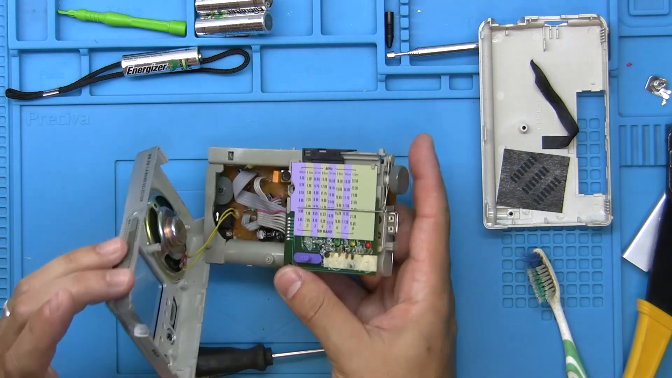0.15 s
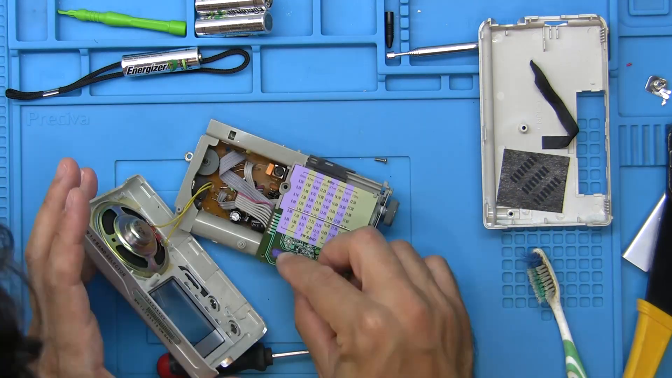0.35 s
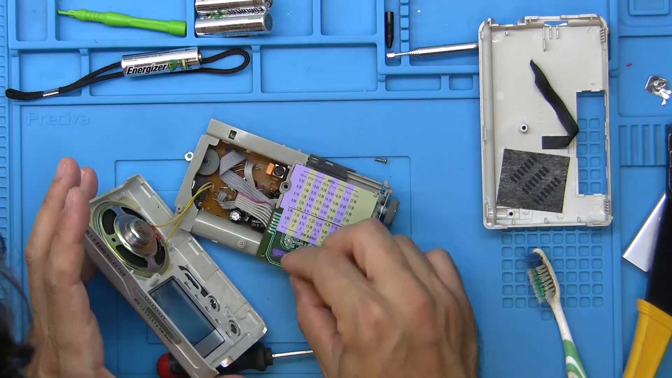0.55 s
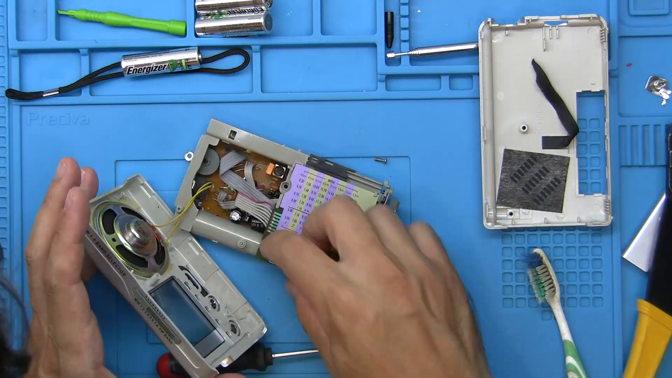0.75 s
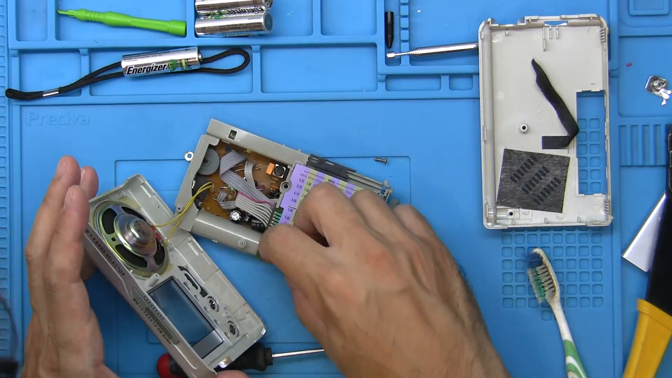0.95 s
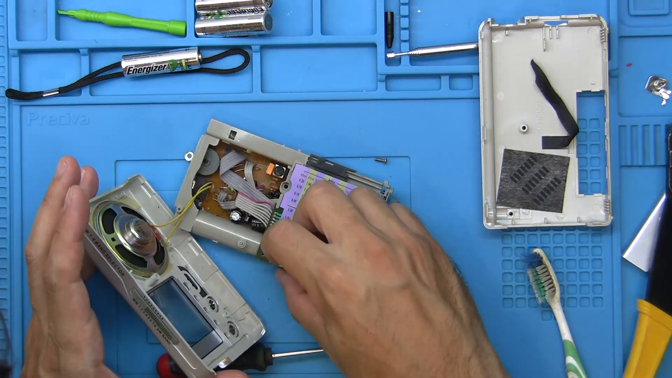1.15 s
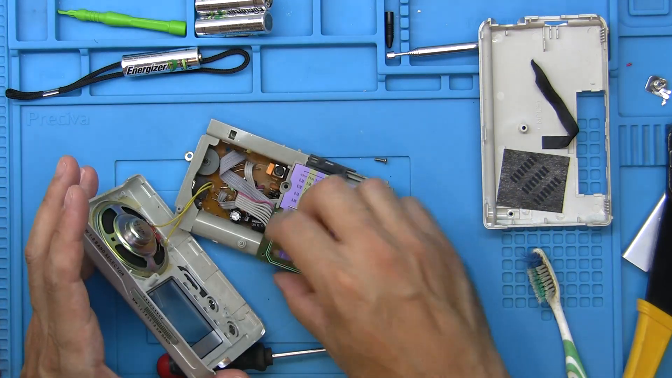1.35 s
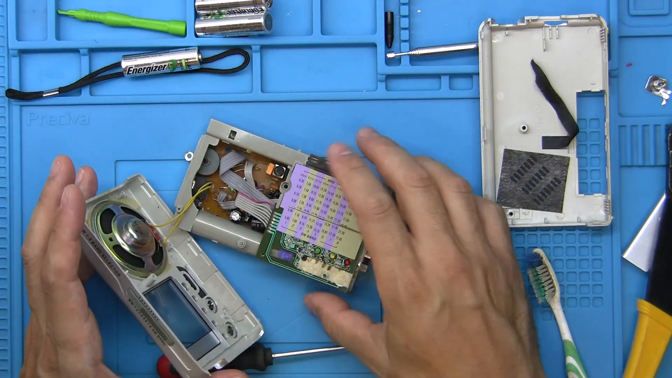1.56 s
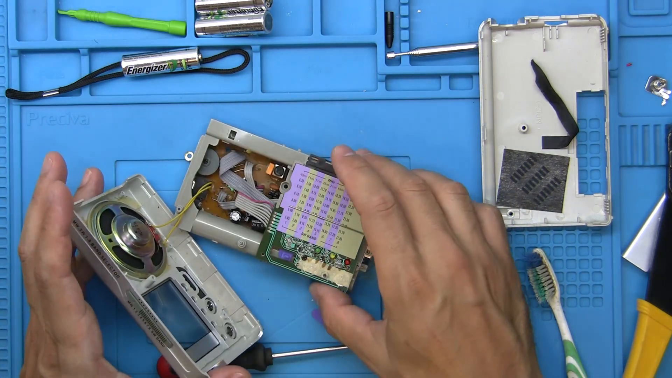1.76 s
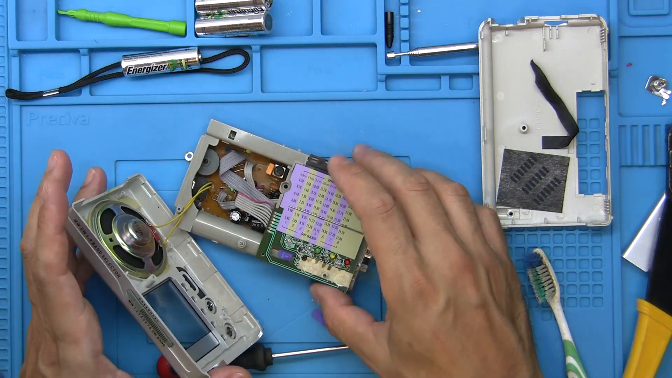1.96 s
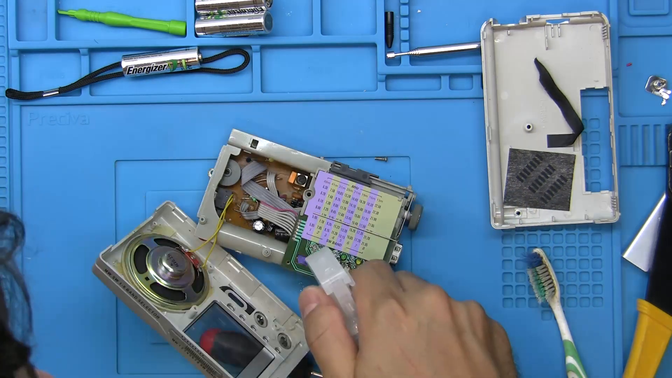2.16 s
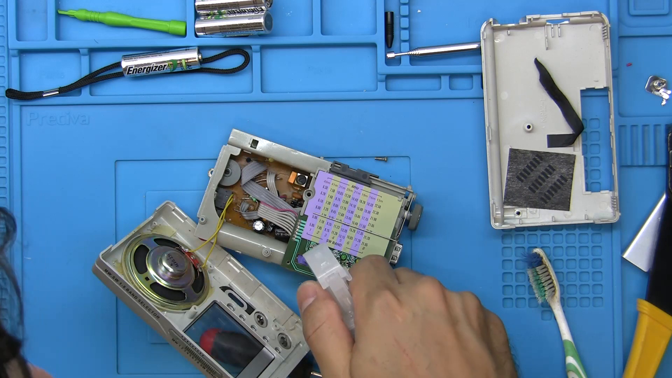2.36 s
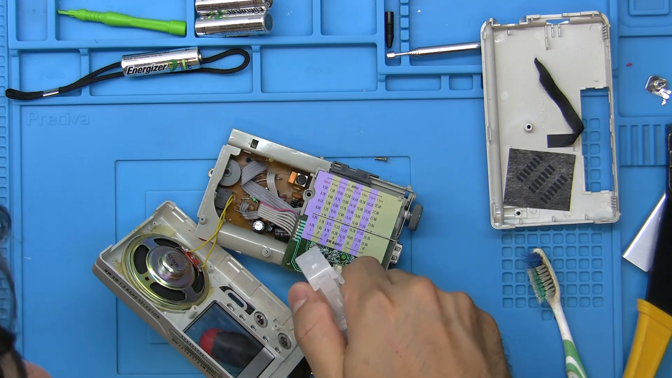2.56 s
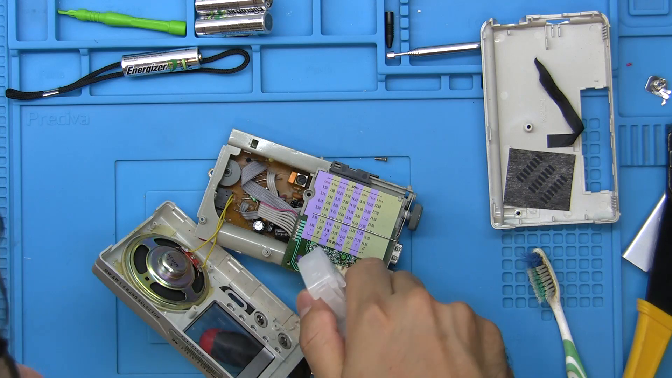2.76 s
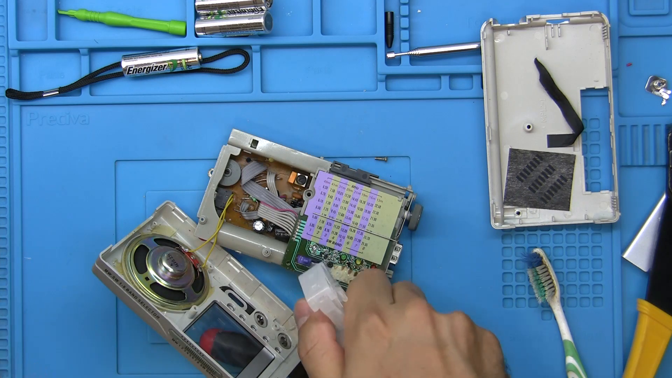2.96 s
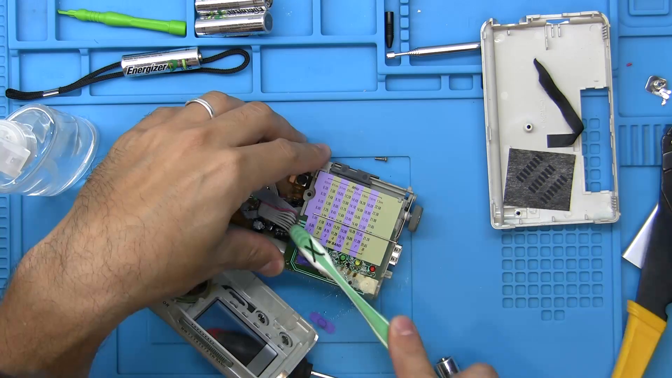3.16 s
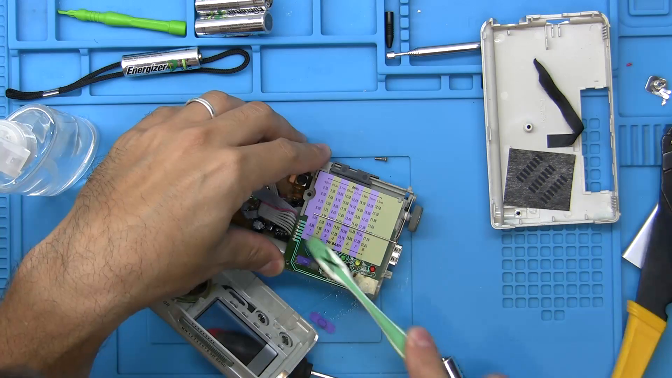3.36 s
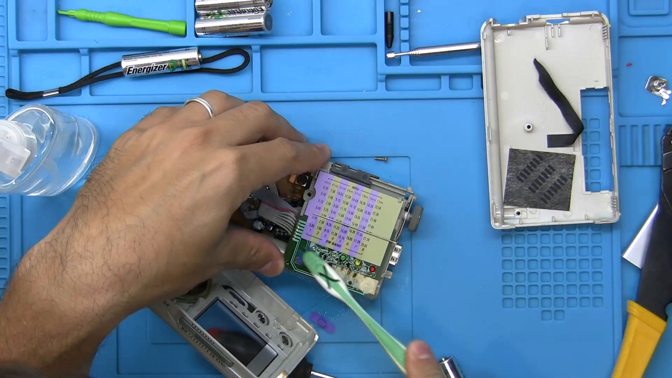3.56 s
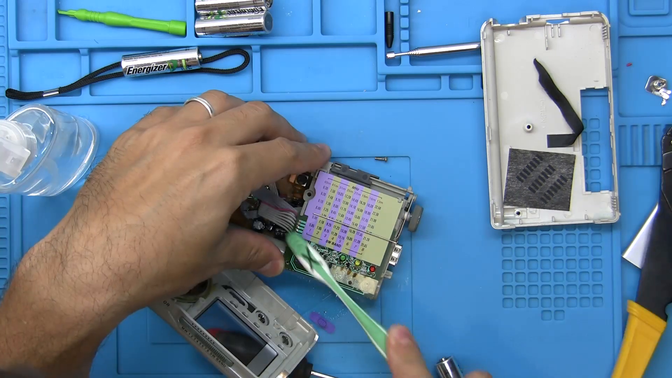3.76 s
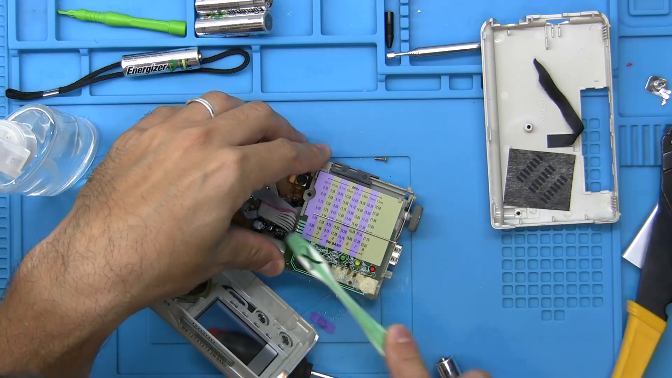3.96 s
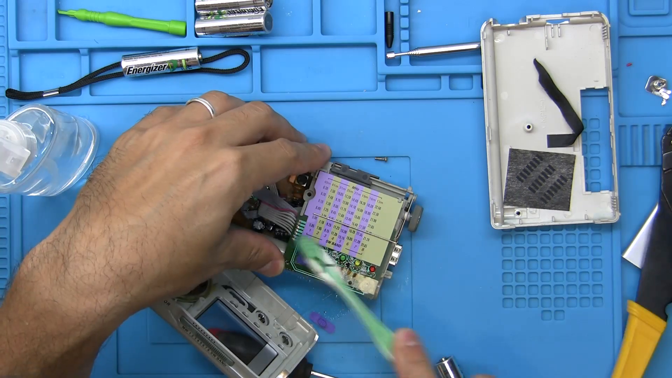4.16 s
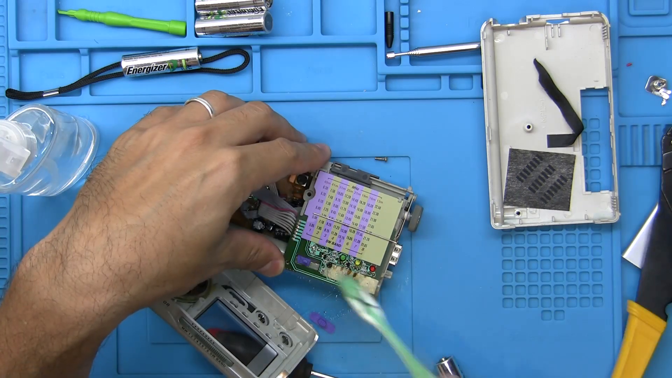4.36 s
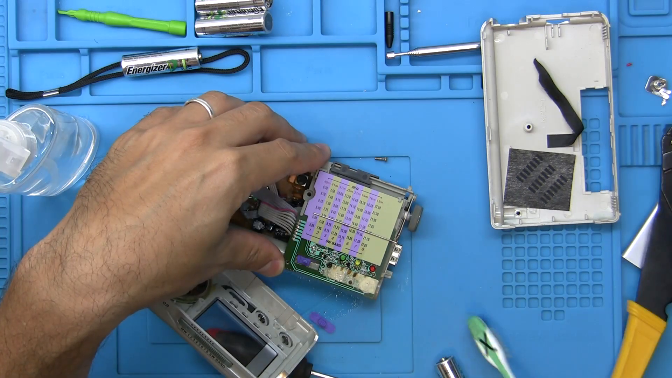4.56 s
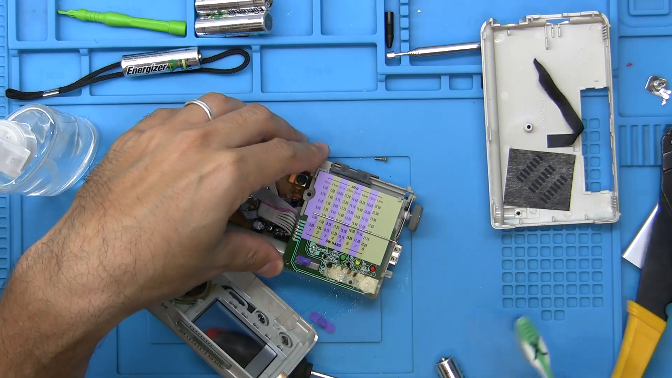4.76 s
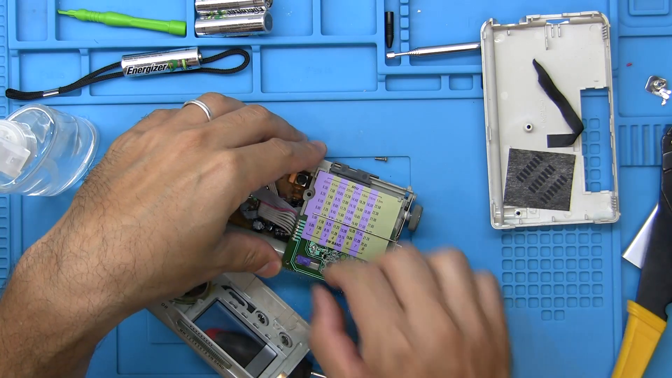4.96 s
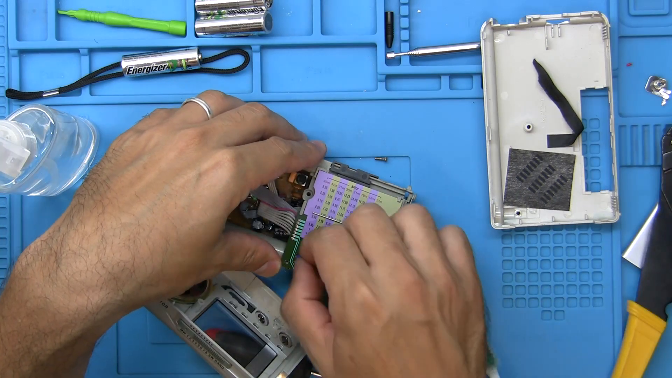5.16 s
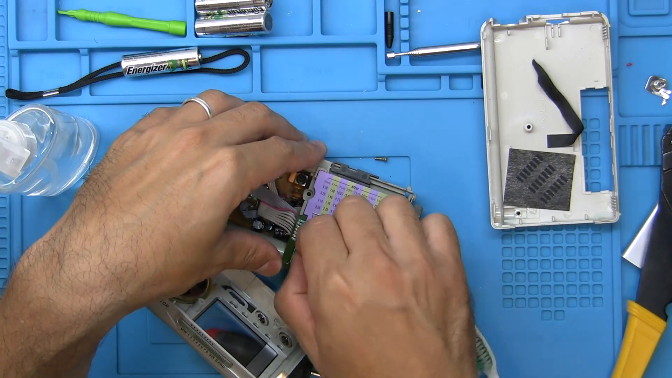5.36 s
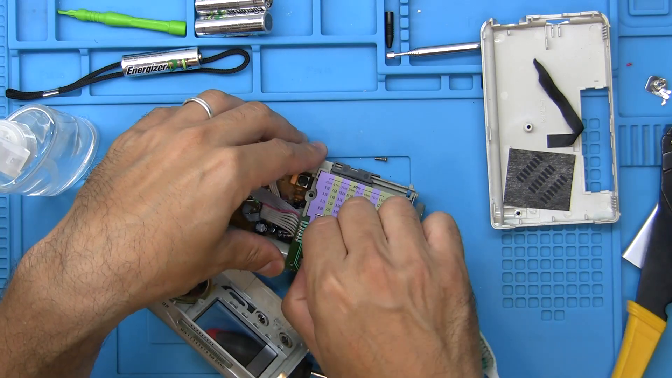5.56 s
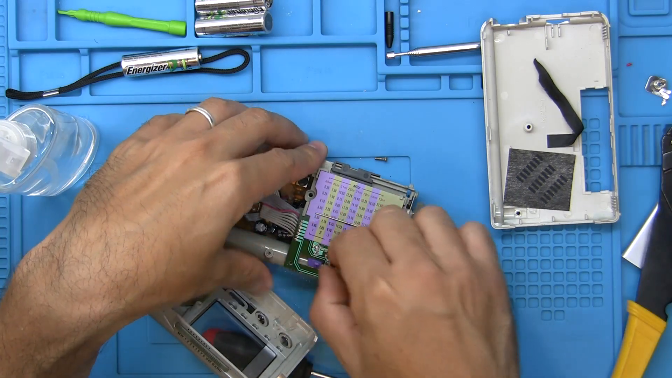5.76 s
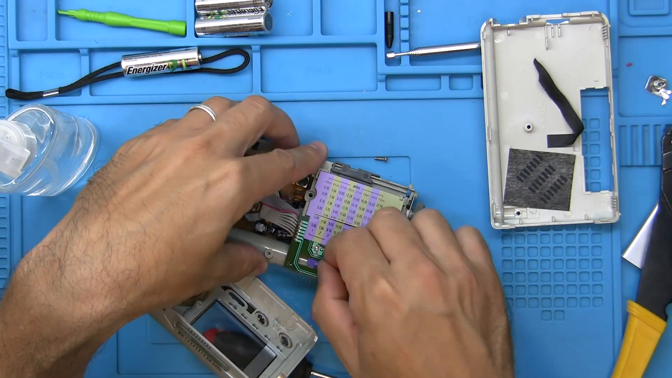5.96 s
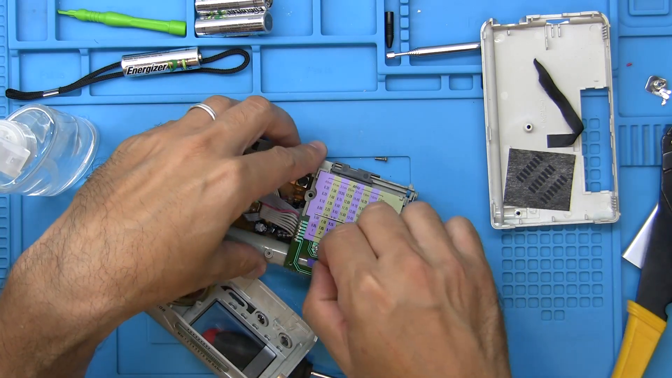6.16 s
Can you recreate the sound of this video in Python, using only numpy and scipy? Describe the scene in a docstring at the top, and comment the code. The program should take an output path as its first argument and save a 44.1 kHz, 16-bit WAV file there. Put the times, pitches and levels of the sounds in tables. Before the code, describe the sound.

Soft thuds and rubbing of a plastic case on a mat, then scattered bright switch clicks, one of them strong. After a quiet gap come two short liquid hisses and about ten scratchy toothbrush strokes with light ticks among them. A dropped hard thing knocks boomily, rebounds more softly, and final clicks follow. Closely miked indoors, with short room echo over steady airy noise and low rumble.

```python
"""A small switch clicks on a circuit board: impulses ring plastic modes and rattle.
It is squirted with cleaner and scrubbed with a toothbrush: coloured grain noise, as is handling on a mat.
Something hard drops and bounces to rest further off: filtered impacts ring its modes and a floor boom.
Throughout, ventilation noise with a fan hum and a low rumble; the level dips briefly three times."""
import sys
import numpy as np
from scipy import signal
from scipy.fft import rfft, irfft
from scipy.io import wavfile
from scipy.ndimage import uniform_filter1d

SR = 44100
rng = np.random.default_rng(int(sys.argv[2]) if len(sys.argv) > 2 else 0)


def transcribe(u):
    """Save the signal u as a 16-bit wav file named by the first command-line argument.

    u: samples, shape (n,) or (channels, n), limited to [-1, 1]; the rate is SR.
    q: integer samples, one column per channel.
    """
    v = np.clip(np.atleast_2d(u).T, -1, 1)
    q = np.round(v * 32767).astype(np.int16)
    wavfile.write(sys.argv[1], SR, q)


N = 273728


def gain_of(db):
    """Amplitude gain of a level in dB."""
    return 10 ** (np.asarray(db) / 20)


def evened(x):
    """Scale to rms 1."""
    return x / np.sqrt(np.mean(x ** 2) + 1e-20)


def read(points, hz):
    """Interpolate a (frequency, value) table over log frequency."""
    f, value = np.transpose(points)
    return np.interp(np.log(hz + 1), np.log(f + 1), value)


def add(mix, start_s, sound):
    """Add a sound into the mix, cut at the end."""
    part = mix[..., round(start_s * SR):][..., :sound.shape[-1]]
    part += sound[..., :part.shape[-1]]


def coloured(x, points):
    """Causal minimum-phase filter with the given spectrum."""
    hz = abs(np.fft.fftfreq(4096, 1 / SR))
    log_gain = np.log(gain_of(np.maximum(read(points, hz), -100)))
    taps = np.fft.ifft(np.exp(np.conj(signal.hilbert(log_gain)))).real[:2048]
    return signal.oaconvolve(x, taps)[:len(x)]


def ring(x, hz, width_hz):
    """One mode of gain 1 at its centre, driven by x."""
    return signal.lfilter(*signal.iirpeak(hz, hz / width_hz, SR), x)


def wander(rate_hz):
    """Slow random drift of rms 1: sines up to rate_hz, slower ones stronger."""
    t = np.arange(N) / SR
    rates_hz = rate_hz * np.geomspace(.05, 1, 12)
    return evened(sum(np.sin(2 * np.pi * (f * t + rng.random())) / np.sqrt(f) for f in rates_hz))


def grains(per_s, spread_db):
    """A dense random train of ticks of uneven size."""
    size = gain_of(spread_db * np.minimum(rng.exponential(1, N), 4)) * rng.standard_normal(N)
    return size * (rng.random(N) < per_s / SR)


def patchy(x, patch_db):
    """Random patches of louder and softer colour over time and pitch."""
    z = signal.stft(x, nperseg=256)[2]
    patches = rng.standard_normal(z.shape[::-1]).T
    patches = uniform_filter1d(uniform_filter1d(patches, 5, axis=0), 9, axis=1)
    return signal.istft(z * gain_of(patch_db * evened(patches)), nperseg=256)[1][:N]


def peaked(peak_s, db, swell_db_per_s, fade_db_per_s):
    """A level that swells to its peak at peak_s and fades, both linear in dB."""
    t = np.arange(N) / SR - peak_s
    return gain_of(db + np.minimum(swell_db_per_s * t, -fade_db_per_s * t))


def panned(x, left_over_right_db):
    """Mono to stereo by level difference."""
    return x * gain_of([[left_over_right_db / 2], [-left_over_right_db / 2]])


# room tone spectrum: (frequency [Hz], relative level [dB])
AIR_SPECTRUM = [(20, -22), (38, -23), (70, -31), (130, -11), (200, -9.5), (330, -11.5), (550, -14.5),
                (900, -20), (1400, -23.5), (2100, -26), (2600, -31.5), (5000, -39), (13500, -52),
                (14800, -72)]
# left-right correlation of the room tone: (frequency [Hz], correlation [-1..1])
AIR_CORRELATION = [(60, -0.63), (240, -0.038), (950, -0.22), (3770, -0.53), (15000, -0.15)]
# fan hum lines: (frequency [Hz], mean level [dB rms], rms waver [share of frequency])
HUM_LINES = [(99.4, -53, 0.0026), (196.3, -53, 0.0071)]
AIR_DB, AIR_START_DB, AIR_SETTLE_S = -48, 3.5, 0.24  # starts louder by AIR_START_DB and settles


def room_tone():
    """Ventilation noise in drifting patches, with wavering hum lines."""
    frames, hz = N // 256 + 5, np.fft.rfftfreq(1024, 1 / SR)
    a, b, c, d, patches = rng.standard_normal((frames, 513, 5)).T
    patches = evened(uniform_filter1d(uniform_filter1d(patches, 10, axis=0), 12, axis=1))
    same = np.clip(read(AIR_CORRELATION, hz), -1, 1)[:, None]
    left = a + 1j * b
    right = same * left + np.sqrt(1 - same ** 2) * (c + 1j * d)
    level_db = read(AIR_SPECTRUM, hz)[:, None] + 1.67 * np.clip(patches, -2, 2)
    z = np.array([left, right]) * gain_of(level_db)
    air = evened(signal.istft(z, nperseg=1024, noverlap=768)[1][:, :N])
    out = air * gain_of(AIR_DB + AIR_START_DB * np.exp(-np.arange(N) / SR / AIR_SETTLE_S))
    for f, db, waver in HUM_LINES:
        turns = np.cumsum(f * (1 + waver * wander(6))) / SR
        out += np.sqrt(2) * gain_of(db + 1.1 * wander(12)) * np.sin(2 * np.pi * turns)
    return out


# rumble level before its random swell: (time [s], level [dB])
RUMBLE_LEVEL = [(0.0, -54.5), (0.3, -59), (1.16, -55.5), (1.9, -54), (2.55, -62.5), (4.7, -62.5),
                (5.08, -58), (6.2, -56)]
# rumble spectrum: (frequency [Hz], relative level [dB])
RUMBLE_SPECTRUM = [(15, -29), (35, 0), (60, 9), (75, -16), (160, 3.5), (300, -46)]
RUMBLE_SWELL_DB = 4.5  # rms


def rumble():
    """Low noise that swells slowly, nearly alike in both channels."""
    spectrum = gain_of(read(RUMBLE_SPECTRUM, np.fft.rfftfreq(N, 1 / SR)))
    mid, side = irfft(rfft(rng.standard_normal((N, 2)).T) * spectrum, N)
    level_db = np.interp(np.arange(N) / SR, *np.transpose(RUMBLE_LEVEL)) + RUMBLE_SWELL_DB * wander(3.16)
    return gain_of(level_db) * evened(np.array([mid + 0.14 * side, mid - 0.66 * side]))


# fingers and case shifting on the mat:
# (peak time [s], envelope peak [dB], swell [dB/s], fade [dB/s])
HAND_SLIPS = [(0.001, -51, 200, 150), (0.104, -45, 600, 170), (0.36, -51, 150, 400), (0.692, -60, 240, 897),
              (0.77, -61, 300, 100), (1.705, -55.5, 900, 130), (2.092, -55, 900, 2000),
              (5.515, -46.5, 900, 132), (5.623, -48, 600, 1400), (5.79, -56.5, 800, 59),
              (6.168, -64, 32, 400)]
# slip spectrum: (frequency [Hz], relative level [dB])
RUSTLE_SPECTRUM = [(180, -40), (300, -11), (405, -17), (455, 11), (555, -7.5), (787, 2.5), (5080, -15.5),
                   (9090, -30), (13800, -29), (16000, -54)]
# case bumping the soft mat: (peak time [s], envelope peak [dB])
MAT_THUDS = [(0.005, -43), (0.112, -43), (0.37, -48.5), (0.478, -46)]
THUD_SWELL_DB_PER_S, THUD_FADE_DB_PER_S = 350, 302


def hands():
    """Skin and plastic drag on silicone in sparse slips; the case thuds dully on the mat."""
    bumps = sum(peaked(s, db, THUD_SWELL_DB_PER_S, THUD_FADE_DB_PER_S) for s, db in MAT_THUDS)
    thuds = bumps * evened(ring(ring(rng.standard_normal(N), 122, 48), 140, 48))
    slips = sum(peaked(*row) for row in HAND_SLIPS)
    return slips * evened(coloured(grains(4000, 1.7), RUSTLE_SPECTRUM)) + thuds


# slide switch and plastic case snapping: (time [s], nominal peak [dB], main ring [Hz],
# treble mode offset [dB], knock [Hz], knock relative to main ring [dB])
SWITCH_CLICKS = [(0.0702, -43, 2250, -25, 452, -2), (0.1005, -31.5, 3400, -39, 570, 37),
                 (0.4409, -34, 3190, -18, 900, -1), (0.6873, -52, 2380, -1, 576, -5),
                 (0.7894, -51, 2260, -4, 452, 5), (1.0223, -20.5, 3360, -8, 790, -9),
                 (1.2435, -39, 3500, -30, 790, -14.5), (1.2495, -27, 3200, -44, 780, -1),
                 (1.4366, -32.5, 3330, -34, 890, -24), (1.4476, -37.5, 2280, -30, 564, -16),
                 (1.6648, -39, 3900, -12, 495, -10), (2.5385, -36.5, 2260, -1, 759, -19),
                 (2.6697, -51, 2440, -16, 452, -12), (2.9993, -24.5, 3600, -15, 664, 7),
                 (3.031, -36, 2830, -4, 635, -14), (3.2098, -35, 3230, -3, 665, -11),
                 (3.2667, -31, 3060, -10, 641, -13), (3.4796, -27.5, 3150, 6, 587, -20),
                 (3.497, -33, 2200, -10, 600, -17), (4.0478, -34, 3120, 4, 633, -14),
                 (4.366, -30.5, 3370, -3, 506, -15), (5.474, -27, 2160, -13, 810, -1),
                 (5.6095, -37, 3230, -30, 810, -14), (5.6237, -31.5, 3230, -24, 821, -14),
                 (5.788, -37.5, 2820, -26, 436, 12)]
# case modes: (frequency [Hz], width [Hz], level relative to main ring [dB], before treble offset)
CASE_MODES = [(1190, 400, -9), (2540, 1500, 3.5), (4260, 1200, -47), (5930, 2000, 9.5), (8600, 740, 6.5),
              (12500, 3500, -24)]
# short faint pips: (time [s], envelope peak [dB], frequency [Hz])
FAINT_PIPS = [(1.857, -62, 4090), (1.934, -66, 4200), (2.013, -63.5, 4000), (3.165, -45.5, 2250),
              (3.174, -46.5, 2430), (4.693, -62, 4000), (6.024, -62, 3190), (6.16, -62.5, 4130)]
RATTLE_MS, PIP_RISE_MS = 3.7, 2.1
CLICK_PAN_DB, CLICK_ECHO_DB = -1.8, -0.6


def clicks():
    """Each snap is a tick ringing the plastic, then a quick rattle; returns close sound and room send."""
    close, sent, t = np.zeros((2, N)), np.zeros(N), np.arange(1500) / SR
    tick = 1. * (t == 0)
    for s, db, hz, treble_db, knock_hz, knock_db in SWITCH_CLICKS:
        main = evened(ring(ring(tick, hz, 730), hz, 2500))
        body = main + gain_of(knock_db) * evened(ring(tick, knock_hz, 120))
        for f, width_hz, mode_db in CASE_MODES:
            offset_db = treble_db if f > 5000 else 0
            body = body + gain_of(mode_db + offset_db) * evened(ring(tick, f, width_hz))
        hits = rng.standard_normal(len(t)) * (rng.random(len(t)) < .15)
        rattle = hits * np.exp(-t * 1000 / RATTLE_MS)
        snap = np.convolve(body, tick + 0.57 * rattle)[:len(t)]
        scale = 3.93 * gain_of(db) / np.linalg.norm(snap)  # level by energy: the peak is left to chance
        add(close, s, panned(scale * snap, CLICK_PAN_DB))
        echo_gain = gain_of(CLICK_ECHO_DB) * scale * np.linalg.norm(snap) / np.linalg.norm(body)
        add(sent, s, echo_gain * body)
    rise = t * 1000 / PIP_RISE_MS
    for s, db, hz in FAINT_PIPS:
        noise = evened(ring(rng.standard_normal(len(t)), hz, 350))
        rough = evened(np.sin(2 * np.pi * hz * t) + 0.48 * noise)
        pip = gain_of(db) * rise * np.exp(1 - rise) * rough
        add(close, s, pip)
        add(sent, s, .4 * pip)
    return close, sent


# reverberation: (frequency [Hz], t60 [s])
ROOM_T60 = [(200, 0.98), (530, 0.4), (1400, 0.43), (3700, 0.47), (9700, 0.38), (15000, 0.15)]
# part of the echo common to both channels: (frequency [Hz], correlation [0..1])
ECHO_CORRELATION = [(200, 0.89), (700, 0.99), (2000, 0.55), (5000, 0.17), (12000, 0.1)]


def room(x, gap_s, early_db, early_s):
    """Sparse echoes of random sign, early ones offset by early_db; each band dies at its own speed."""
    taps, start = np.zeros((2, SR)), int(gap_s * SR)
    slots = np.arange(start, SR - 10, 10)  # one tap in every 10 samples
    at = slots + rng.integers(0, 10, (2, len(slots)))
    early_gain = gain_of(early_db * np.exp(-slots / SR / early_s))
    np.put_along_axis(taps, at, rng.choice([-1., 1.], at.shape) * early_gain, 1)
    hz, t, z = signal.stft(taps, SR, nperseg=256)
    same = np.clip(read(ECHO_CORRELATION, hz), 0, 1)[:, None]
    z = np.array([z[0], same * z[0] + np.sqrt(1 - same ** 2) * z[1]])
    decay = gain_of(-60 * t / read(ROOM_T60, hz)[:, None])
    tail = signal.istft(z * decay, SR, nperseg=256)[1]
    return signal.fftconvolve(x[None], tail / np.linalg.norm(tail[0]), axes=1)[:, :N]


# squirts from the bottle: (start [s], held level [dB])
BOTTLE_SQUIRTS = [(2.536, -46.5), (3.027, -43)]
# short after-hiss: (peak time [s], envelope peak [dB])
AFTER_DRIBBLES = [(2.675, -66), (3.16, -57)]
# nozzle hiss spectrum: (frequency [Hz], relative level [dB])
JET_SPECTRUM = [(590, -29), (1000, -3), (2230, 1.5), (2980, -3), (3710, 0), (7530, -5), (9600, -5),
                (16000, -10)]
SQUIRT_RISE_S, SQUIRT_HOLD_S, SQUIRT_FALL_DB_PER_S = 0.0046, 0.028, 270  # hold includes the rise


def squirts():
    """Turbulent liquid hiss from the nozzle: a quick start, a short hold, a fade and a last dribble."""
    t = np.arange(N) / SR
    level = sum(peaked(s, db, 600, 450) for s, db in AFTER_DRIBBLES)
    for s, db in BOTTLE_SQUIRTS:
        fade_db = SQUIRT_FALL_DB_PER_S * np.maximum(t - s - SQUIRT_HOLD_S, 0)
        level = level + np.clip((t - s) / SQUIRT_RISE_S, 0, 1) * gain_of(db - fade_db)
    return level * evened(coloured(grains(14000, 1.9), JET_SPECTRUM))


# bristle strokes: (start [s], length [s], starting level [dB], treble offset [dB])
BRUSH_STROKES = [(3.195, 0.068, -41, -3), (3.333, 0.076, -44.5, 0), (3.461, 0.097, -45.5, -6),
                 (3.609, 0.1, -48, 5.5), (3.752, 0.081, -47, 1.5), (3.89, 0.081, -49.5, 5),
                 (4.024, 0.081, -50, 1), (4.138, 0.095, -47.5, 4), (4.257, 0.078, -48.5, 2),
                 (4.358, 0.11, -50, 6.5)]
# bristle spectrum: (frequency [Hz], relative level [dB])
BRISTLE_SPECTRUM = [(820, -26), (1400, -7.5), (1600, -9), (1730, -5), (2580, -5.5), (3130, 0), (4810, -7),
                    (6260, -4.5), (7530, -9), (8770, -5), (11300, -7.5), (14900, -12.5), (16000, -17)]
STROKE_RISE_S, STROKE_FALL_S = .022, 0.033
FIRST_CHANGE_DB, LAST_CHANGE_DB = -6.5, 2  # early strokes fade as they go, late ones press harder
# bristles keep touching between strokes, then lift
DRAG_FROM_S, DRAG_TO_S, DRAG_DB, LIFT_DB_PER_S = 3.2, 4.447, -54, 130


def brush():
    """Thousands of bristle tips flick over the parts in clumps; each stroke starts fast, holds, then slows."""
    t = np.arange(N) / SR
    clumps = gain_of(1.0 * evened(uniform_filter1d(rng.standard_normal(N), 250)))
    flicks = coloured(clumps * grains(6000, 0.96), BRISTLE_SPECTRUM)
    tips = evened(patchy(flicks, 2.0))  # bristles meet other parts as they move
    treble = signal.sosfilt(signal.butter(2, 7000, "high", fs=SR, output="sos"), tips)
    lift_db = LIFT_DB_PER_S * np.maximum(t - DRAG_TO_S, 0)
    body = top = (t > DRAG_FROM_S) * gain_of(DRAG_DB - lift_db)
    changes_db = np.linspace(FIRST_CHANGE_DB, LAST_CHANGE_DB, len(BRUSH_STROKES))
    for (s, length_s, db, treble_db), change_db in zip(BRUSH_STROKES, changes_db):
        start = np.clip((t - s) / STROKE_RISE_S, 0, 1)
        stop = np.clip((s + length_s - t) / STROKE_FALL_S + .5, 0, 1)
        level = start * stop * gain_of(db + change_db * np.clip((t - s) / length_s, 0, 1))
        body = body + level
        top = top + level * gain_of(treble_db)
    return body * (tips - treble) + top * treble


# bounces of the dropped object: (time [s], relative blow level [dB], hardness as cut-off [Hz],
# mode offset [dB], relative crack level [dB])
DROP_BOUNCES = [(4.8299, -5, 6250, -6.5, -14.5), (5.0723, -12, 2670, -4.5, -34.5),
                (5.291, -30, 1970, 3, -48), (5.480, -34, 1850, 29, -56), (5.716, -35.5, 1650, 5, -50),
                (5.846, -38.5, 1650, 6, -48)]
# modes of the dropped object: (frequency [Hz], level before mode offset [dB], width [Hz])
OBJECT_MODES = [(203, 5.5, 18), (433, 11.5, 13), (507, 15.5, 27), (800, 14.5, 50), (1000, 1, 38),
                (1134, 7, 41), (1375, -6, 95), (1635, -3, 34), (1986, -5, 75), (2080, -4, 100),
                (2300, 0, 98), (4670, 7, 820)]
# blow spectrum: (frequency [Hz], relative level [dB])
CLACK_SPECTRUM = [(59, -66), (100, -34), (208, -18), (620, -13), (797, -12.5), (1660, -4), (4840, -19.5),
                  (15000, -46.5)]


def bounces():
    """Each blow is a broad clack ringing the object's modes, plus a crack; softer landings lose treble."""
    blows, rings, cracks, t = np.zeros(N), np.zeros(N), np.zeros(N), np.arange(SR // 4) / SR
    tick = 1. * (t == 0)
    for s, db, cutoff_hz, ring_db, crack_db in DROP_BOUNCES:
        softening = signal.butter(4, cutoff_hz, fs=SR, output="sos")
        clack = signal.sosfilt(softening, coloured(tick, CLACK_SPECTRUM))
        modes = sum(gain_of(g + ring_db) * ring(clack, f, width_hz) for f, g, width_hz in OBJECT_MODES)
        scale = gain_of(db) / 20 / np.std(clack + modes)
        add(blows, s, scale * clack)
        add(rings, s, scale * modes)
        burst = (4 * tick + .5 * rng.standard_normal(len(t))) * np.exp(-t / 0.0025)
        add(cracks, s, gain_of(crack_db) * ring(ring(burst, 4700, 4600), 4800, 5400))
    return blows, rings, cracks


# floor boom under the first landing: (level [dB], frequency [Hz], t60 [s])
FLOOR_BOOM = (-23, 208, 0.17)


def thump():
    """A low floor mode that swells within a few cycles and dies."""
    db, hz, t60_s = FLOOR_BOOM
    t = np.maximum(np.arange(N) / SR - DROP_BOUNCES[0][0], 0)
    return gain_of(db - 60 * t / t60_s) * (1 - np.exp(-t / 0.0052)) * np.sin(2 * np.pi * hz * t)


def scene():
    """Close bench sounds and the distant drop, each with its own echo, over room tone and rumble."""
    (snaps, sent), (blows, rings, cracks) = clicks(), bounces()
    rubbed = panned(brush(), -2.1) + panned(squirts(), -0.8) + panned(hands(), -0.94)
    bench = sent + gain_of(-5) * rubbed.mean(0)
    near = snaps + gain_of(-3.0) * rubbed + room(bench, .002, 2.7, 0.01)
    direct = cracks + gain_of(-10) * blows + gain_of(3.0) * rings + thump()
    drop_send = gain_of(7) * (blows + rings) + gain_of(6) * cracks
    far = room(drop_send, 0.00066, -2, 0.0072)
    return near + panned(direct, -.4) + far + room_tone() + rumble()


# brief level dips: centre time [s]
LEVEL_DIPS = [0.400, 2.102, 3.202]
DIP_HALF_S, DIP_MIN_GAIN = .0055, .1
EDGE_HZ = 15850


def record(dry):
    """Brief dips in level, then a low-pass band limit."""
    t, fade = np.arange(N) / SR, np.ones(N)
    for s in LEVEL_DIPS:
        fade *= np.clip(abs(t - s) / DIP_HALF_S, DIP_MIN_GAIN, 1)
    low_pass = signal.firwin(511, EDGE_HZ, window=("kaiser", 9), fs=SR)
    return signal.oaconvolve(dry * fade, low_pass[None], "same")


dry = scene()
out = record(dry)
transcribe(out)
```